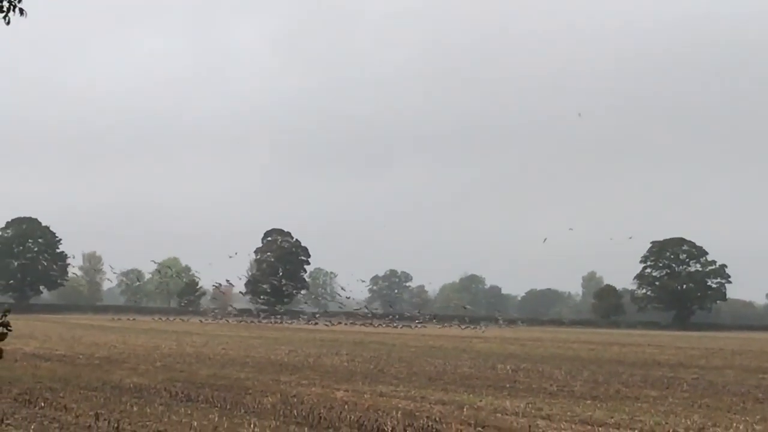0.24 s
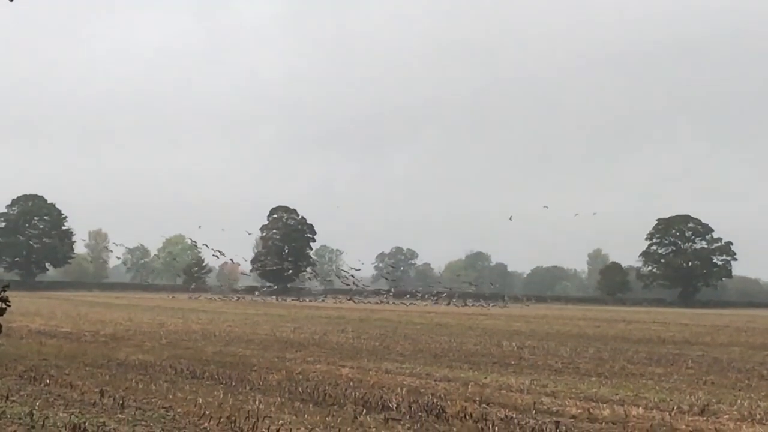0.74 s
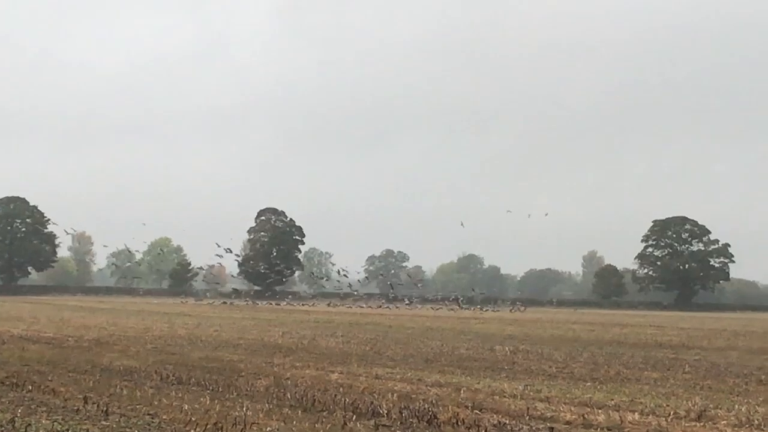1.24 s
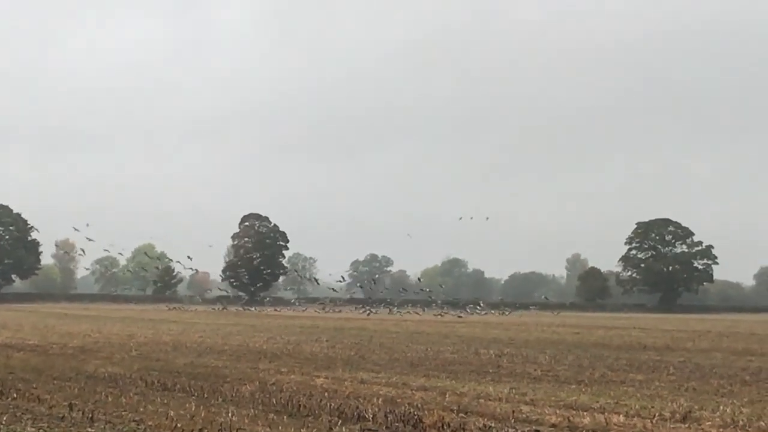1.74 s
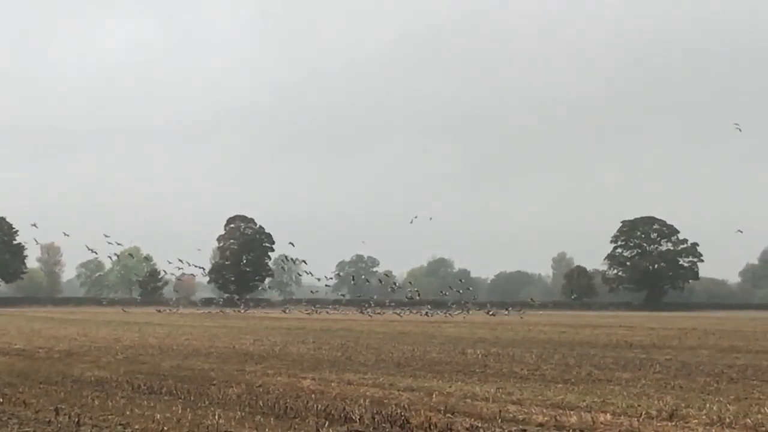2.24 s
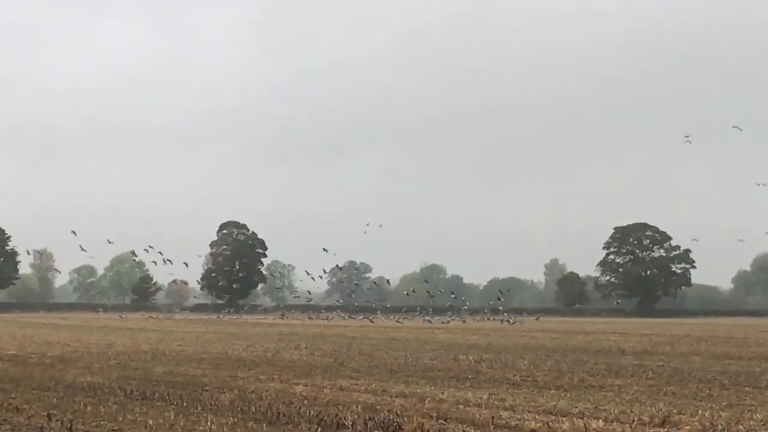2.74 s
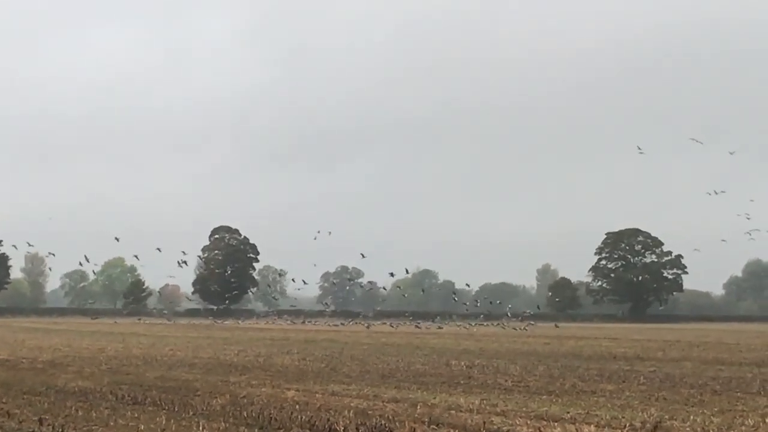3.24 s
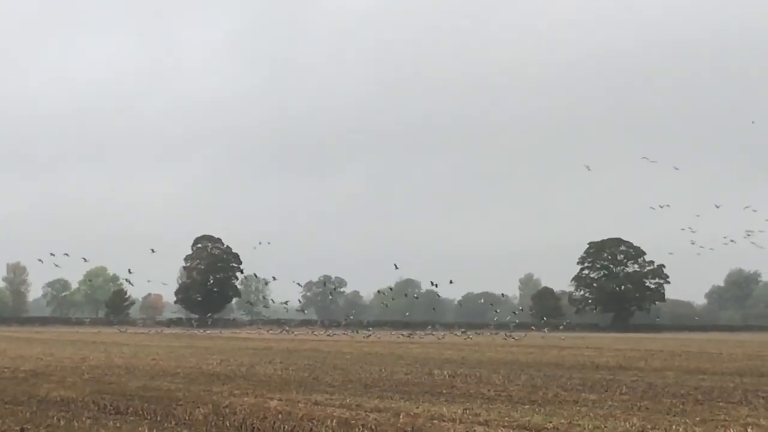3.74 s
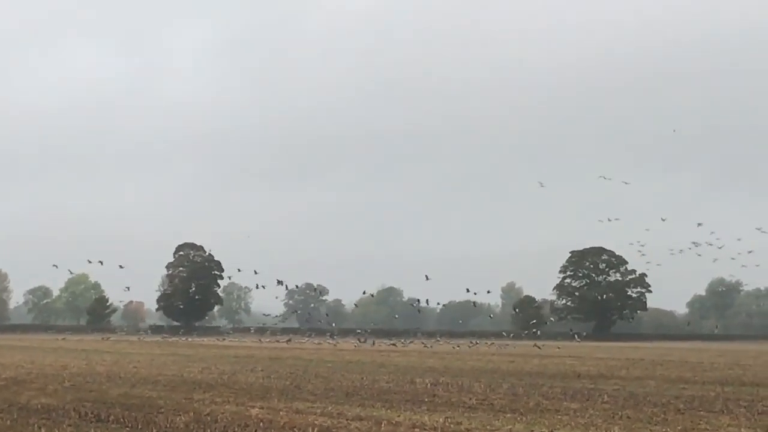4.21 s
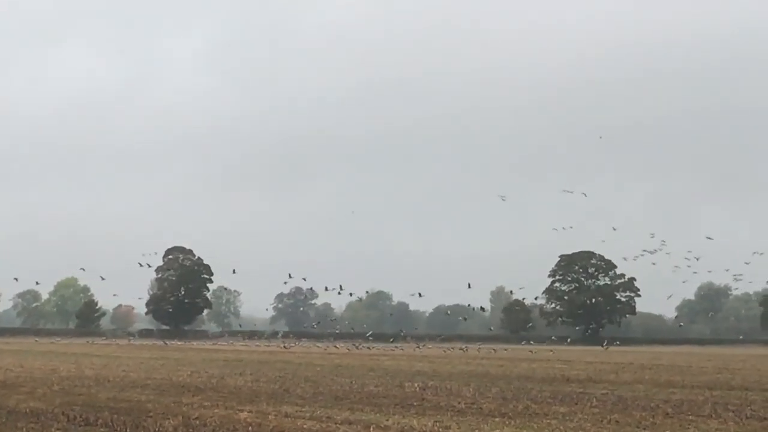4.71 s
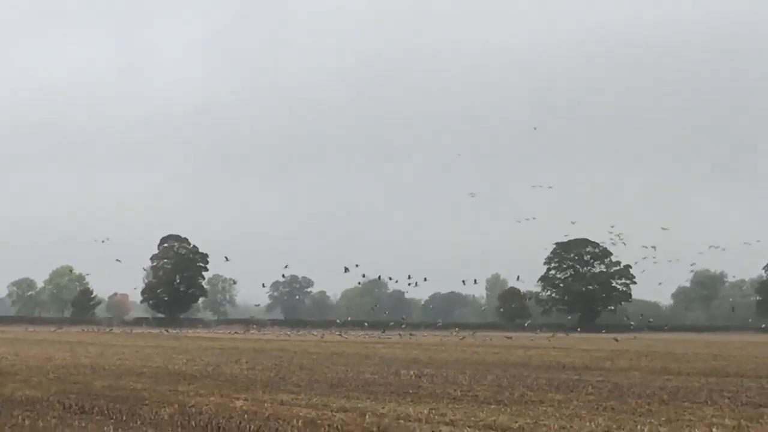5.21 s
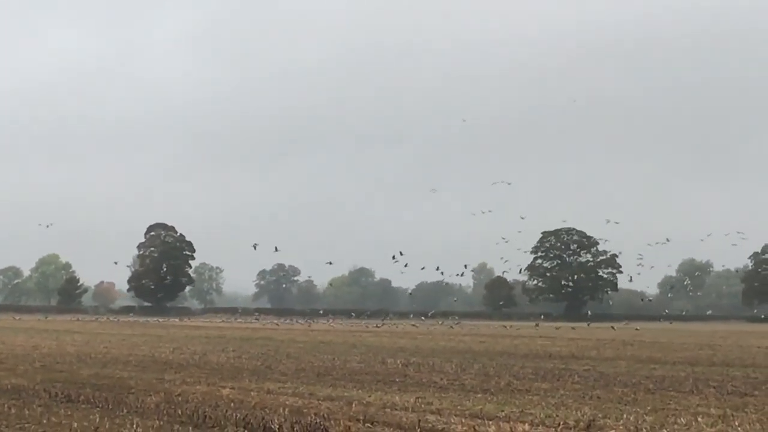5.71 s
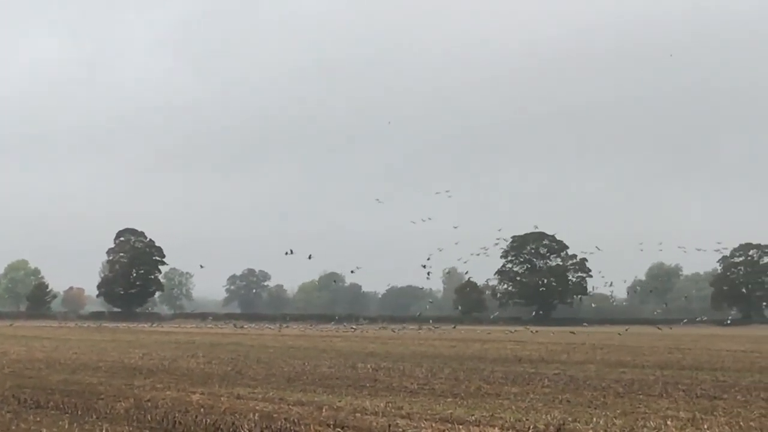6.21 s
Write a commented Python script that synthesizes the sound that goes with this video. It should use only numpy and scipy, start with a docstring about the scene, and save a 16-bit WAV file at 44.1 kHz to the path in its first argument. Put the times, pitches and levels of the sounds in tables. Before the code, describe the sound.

A large flock of geese calls from a distant open field for about six and a half seconds. From the first moment, low nasal honks, short hoarse cackles and high arching yelps stand out from a dense, overlapping chorus, with a slight echo from the trees. The calls sound thin, with little bass. A couple of small dry ticks come close by at about 1.2 seconds. The geese are loudest from 2.3 to 2.7 seconds, with a sharp yelp and a quick run of cackles. Honking continues, with more clear yelps around 3.4 and from 4.2 to 4.7 seconds. After 5 seconds the chorus thins somewhat but keeps going to the end, and faint dry ticks and very faint high seeps come more often. A far rumble, a low hum and soft microphone hiss lie beneath throughout.

```python
"""A large flock of geese rises from a distant stubble field. From the outset, hoarse cackles, low honks and
high arched yelps stand over a dense chorus: syrinx membranes pulse, chest and beak resonate, a tree line
echoes. The calls are strongest near 2.4 s; after 5 s the chorus thins, and faint seeps and dry ticks come
more often. Far rumble, a hum and microphone hiss lie beneath throughout."""
import sys
import numpy as np
from scipy import signal
from scipy.fft import rfft, irfft
from scipy.io import wavfile
from scipy.ndimage import uniform_filter1d

SR = 44100
rng = np.random.default_rng(int(sys.argv[2]) if len(sys.argv) > 2 else 0)


def master_out(mix):
    """Clip the mix to full scale and print it as 16-bit PCM to the path in sys.argv[1]."""
    frames = np.transpose(np.atleast_2d(mix))
    ceiling = np.clip(frames, -1, 1)
    pcm = np.round(ceiling * 32767).astype(np.int16)
    wavfile.write(sys.argv[1], SR, pcm)


N = 284886
CHEST_WIDTH_HZ, BEAK_WIDTH_HZ = 380, 720


def undb(db):
    """Amplitude ratio of a level: tenfold per 20 dB."""
    return 10 ** (np.asarray(db) / 20)


def level(x, db):
    """Normalisation to an rms level."""
    return x * undb(db) / np.sqrt(np.mean(x ** 2))


def ring(x, hz, width_hz):
    """Resonance: two equal resonators in cascade, with unit gain at the centre."""
    b, a = signal.iirpeak(hz, hz / width_hz, fs=SR)
    return signal.lfilter(b, a, signal.lfilter(b, a, x))


def highpass(x, hz, order):
    """Butterworth filtering: below the cutoff the level falls 6 dB per octave per order."""
    return signal.sosfilt(signal.butter(order, hz, "high", fs=SR, output="sos"), x)


def walk(rate_hz, size):
    """Random modulation: Gaussian values joined by ramps, standard deviation near 1."""
    hold = max(int(SR / rate_hz), 2)
    steps = np.repeat(rng.standard_normal(size // hold + 1), hold)
    return 1.217 * uniform_filter1d(steps, hold)[:size]


def coloured(points, db):
    """Spectral shaping: white noise weighted by a curve of (f/Hz, relative level/dB) points."""
    hz, gain_db = np.transpose(points)
    bins = np.maximum(np.fft.rfftfreq(N, 1 / SR), 1)
    gain = undb(np.interp(np.log(bins), np.log(hz), gain_db))
    return level(irfft(rfft(rng.standard_normal(N)) * gain, N), db)


def add(track, onset, sound):
    """Superposition: a sound joins the track at its onset in seconds."""
    i = int(onset * SR)
    part = sound[max(-i, 0):max(N - i, 0)]
    track[max(i, 0):max(i, 0) + len(part)] += part


def noise_floor():
    """Narrow-band noise hums; slow amplitude modulation swells the rumble and makes the hiss flicker."""
    # spectrum of the far rumble: f/Hz, relative level/dB
    rumble_spectrum = [(15, -48), (25, -30), (39, -3), (59, 1), (141, -9.5), (237, -9.5), (305, -20),
                       (397, -26), (505, -32.5), (600, -22.5), (780, -19), (1320, -120)]
    # spectrum of the microphone hiss: f/Hz, relative level/dB
    hiss_spectrum = [(500, 5), (3000, -6.5), (7600, -11), (9400, -11), (10400, -16), (13500, -10),
                     (16500, -14), (18000, -14)]
    hum = level(ring(rng.standard_normal(N), hz=48.5, width_hz=7.1), db=-64)
    rumble = coloured(rumble_spectrum, db=-56.5) * undb(.7 * walk(3, N))
    hiss = coloured(hiss_spectrum, db=-68) * undb(.8 * walk(12, N))
    whine = level(np.sin(2 * np.pi * 14000 * np.arange(N) / SR), db=-95)
    return rumble + hum + hiss + whine


def ticks():
    """Broadband transients: bright noise with a fast exponential decay and a faint slower tail."""
    # dry ticks close by: t/s, nominal peak level/dB
    cracks = [(1.194, -37), (1.257, -44), (3.2321, -48), (4.3879, -56), (4.4837, -49), (5.3078, -48),
              (5.524, -52), (5.573, -55), (5.671, -50), (5.7643, -53)]
    out, t = np.zeros(N), np.arange(SR // 20) / SR
    decay = np.exp(-t / .0017) + .16 * np.exp(-t / .012)
    for onset, db in cracks:
        add(out, onset, undb(db - 14.5) * rng.standard_normal(len(t)) * decay)
    return highpass(out, 5000, order=2)


def seeps():
    """Random amplitude modulation gives gliding tones sidebands that blur them into bands of noise."""
    # buzzy seeps and rustles: t/s, duration/s, start f/Hz, end f/Hz, width/Hz, level before the fade/dB
    glides = [(0.838, 0.1, 8140, 8060, 300, -82), (0.906, .05, 12500, 12400, 700, -82),
              (1.06, 0.13, 8160, 8150, 400, -82), (1.204, 0.11, 8400, 8100, 500, -80),
              (1.395, .05, 12600, 12600, 700, -82), (2.67, .05, 15200, 15200, 607, -77),
              (2.93, .03, 15000, 15000, 600, -81), (4.056, .12, 8460, 8200, 910, -78),
              (5.347, 0.27, 13700, 13200, 6000, -75.5), (5.364, 0.16, 7950, 7750, 450, -80),
              (5.415, 0.045, 14900, 15000, 1200, -70), (5.42, .018, 13000, 13000, 2500, -73),
              (5.465, 0.03, 14600, 15000, 1200, -70), (5.462, .022, 13000, 13000, 2500, -72),
              (5.47, .07, 12700, 12700, 600, -80), (5.49, 0.1, 7200, 7200, 500, -82),
              (6.258, 0.11, 8460, 8700, 810, -76)]
    out = np.zeros(N)
    for onset, length, start_hz, end_hz, width_hz, db in glides:
        u = np.arange(int(length * SR)) / (length * SR)
        tone = np.sin(2 * np.pi * np.cumsum(start_hz + (end_hz - start_hz) * u) / SR)
        fade = np.sqrt(np.sin(np.pi * u))
        add(out, onset, level(tone * walk(width_hz, len(u)), db) * fade)
    return out


def tree_echo(x, t60_s=.4, delay_s=.012, db=-12):
    """Scattering by the tree line: convolution with an exponentially decaying noise tail."""
    t = np.arange(SR // 2) / SR
    tail = rng.standard_normal(len(t)) * 1000 ** (-t / t60_s) * (t > delay_s)
    return undb(db) * signal.fftconvolve(x, tail / np.sqrt(np.sum(tail ** 2)))[:N]


def syrinx(length, hz, rise, sag, jitter, shimmer, taper):
    """Periodic membrane pulses form a harmonic series; its pitch rises to hz and sags, by fractions."""
    u = np.arange(int(length * SR)) / (length * SR)
    arch = hz * (1 - rise * (1 - u) * (1 - 2 * u) - sag * u * (2 * u - 1))
    pitch = arch * (1 + jitter * walk(89.14, len(u)))
    half_phase = np.pi * np.cumsum(pitch) / SR + 1e-3
    harmonics = int(7400 / hz)
    # closed-form sum of equally strong harmonics
    pulses = (np.sin((2 * harmonics + 1) * half_phase) / np.sin(half_phase) - 1) / np.sqrt(2)
    return pulses * (1 + shimmer * walk(300, len(u))) * np.sin(np.pi * u) ** taper


def chorus(formants, low_hz, high_hz, mean_s, arch, jitter, shimmer, count):
    """Incoherent summation: unrelated calls, evenly spread in time, pass through shared resonances."""
    calls = np.zeros(N)
    for k, (late, pitch, stretch, sag, loud) in enumerate(rng.random((count, 5))):
        hz = low_hz * (high_hz / low_hz) ** pitch
        pulses = syrinx(mean_s * (.5 + stretch), hz, arch / 2, arch * sag, jitter, shimmer, taper=.073)
        onset = (k + late) / count * (N / SR + .4) - .3
        add(calls, onset, pulses * np.sqrt(hz) * undb(6.3 * loud))
    crowd = sum(undb(db) * ring(calls, hz, width) for hz, width, db in formants)
    return crowd / np.sqrt(uniform_filter1d(crowd ** 2, size=SR // 8))  # running rms held near 1


def far_geese():
    """Four choruses superpose, their envelopes following the chest band, the beak band or the mean."""
    # loudness of the flock: t/s, chest band level/dB, beak band level/dB
    contour = [(0, -40, -45.5), (.13, -46, -47), (.27, -53, -49.5), (.38, -45.5, -49), (.62, -45, -51),
               (.9, -43.5, -49), (1.07, -45.5, -51), (1.2, -42, -46.5), (1.42, -48.5, -53.5),
               (1.71, -46.5, -53.5), (1.82, -50.5, -60), (1.91, -41, -58), (2.12, -46, -53.5),
               (2.19, -57, -58), (2.32, -46.5, -45.5), (2.53, -45.5, -48.5), (2.58, -46, -50),
               (2.72, -45, -55.5), (2.93, -42.5, -57.5), (3.03, -44, -60.5), (3.3, -45.5, -54.5),
               (3.72, -47.5, -58), (3.98, -49, -63.5), (4.1, -46, -59), (4.2, -47, -55.5),
               (4.41, -48.5, -60), (4.6, -46.5, -53), (5.2, -46, -57), (5.28, -52.5, -63),
               (5.37, -53.5, -61), (5.7, -56, -58.5), (6.03, -50.5, -54.5), (6.46, -49.5, -60)]
    # formants smeared over many birds, a set per kind of call: f/Hz, width/Hz, relative level/dB
    chest_formants = [(1110, 580, 15), (1122, 220, -3), (1357, 198, 6)]
    throat_formants = [(2337, 570, -0.5), (5770, 400, -19.5)]
    beak_formants = [(3335, 1320, 37), (4270, 3900, -27), (6000, 1800, -75)]
    yelp_formants = [(3430, 910, 2.5), (4200, 1000, -16), (1720, 320, 0)]
    times, *bands = np.transpose(contour)
    chest_db, beak_db = (np.interp(np.arange(N) / SR, times, band) for band in bands)
    honking = chorus(chest_formants, 210, 420, .095, arch=.1009, jitter=.0041, shimmer=.49, count=200)
    mixed = chorus(throat_formants, 250, 1150, .1, arch=.12, jitter=.0045, shimmer=.24, count=200)
    hoarse = chorus(beak_formants, 250, 620, .08, arch=.0615, jitter=.01227, shimmer=.25, count=320)
    yelping = chorus(yelp_formants, 840, 1250, .09, arch=.13, jitter=.003, shimmer=.25, count=110)
    return (undb(chest_db - 3) * honking + undb((chest_db + beak_db) / 2 - 10) * mixed
            + undb(beak_db - 5) * hoarse + undb(beak_db - 9) * yelping)


def cackles(crest_db=8.5):
    """Scattering by stubble and air smears each beak-filtered pulse over a few milliseconds."""
    # short hoarse calls: t/s, nominal peak level/dB, beak f/Hz, duration/s, fundamental f/Hz
    calls = [(.009, -48, 4050, 0.054, 231), (0.107, -45, 4070, 0.04, 236.6), (0.174, -58, 5050, 0.049, 225),
             (0.283, -47.5, 3850, 0.17, 228.3), (0.528, -51.5, 3900, 0.048, 236),
             (1.186, -51, 3500, 0.091, 231), (1.331, -49, 4480, 0.029, 230),
             (1.477, -49, 3530, 0.083, 232.3), (1.571, -53, 3420, 0.073, 226),
             (1.636, -50.5, 3600, 0.077, 229), (1.924, -62, 5440, 0.16, 266),
             (2.048, -61, 5700, 0.073, 267), (2.292, -41, 3600, 0.05, 234), (2.38, -44, 4200, 0.04, 232),
             (2.545, -41, 3600, 0.052, 225.3), (2.606, -41, 3600, 0.026, 229),
             (2.657, -43.5, 3750, 0.038, 232), (2.838, -54, 3950, 0.11, 227),
             (3.073, -55, 3580, 0.028, 230), (3.168, -55, 3600, 0.037, 228.4),
             (3.477, -51, 3240, 0.041, 213), (3.773, -54, 3920, 0.078, 311), (3.817, -61, 4660, 0.054, 450),
             (4.467, -44, 3220, 0.051, 226.3), (4.955, -53, 2820, 0.1, 230.5), (5.18, -70, 5460, 0.06, 232),
             (5.56, -52.5, 2870, 0.068, 230), (5.714, -54, 3600, 0.038, 230), (5.929, -47, 3360, 0.08, 314),
             (6.158, -53, 3400, 0.049, 225)]
    out = np.zeros(N)
    decay = np.exp(-np.arange(SR // 100) / SR / .003)
    for onset, db, beak_hz, length, hz in calls:
        pulses = syrinx(length, hz, rise=.0397, sag=.0397, jitter=.015, shimmer=.45, taper=.6)
        scattered = np.convolve(pulses, rng.standard_normal(len(decay)) * decay)
        voice = ring(scattered, beak_hz, 1100) + undb(-17) * ring(scattered, 5000, 1000)
        add(out, onset, level(voice, db - crest_db))
    return out


def honks():
    """Source and filter: low-pitched pulses excite the chest resonance and, faintly, the beak."""
    # low calls: t/s, duration/s, fundamental f/Hz, chest f/Hz, chest gain/dB
    calls = [(.025, .08, 275, 1300, -46), (.345, .07, 276, 1100, -49), (.5, .06, 275, 1100, -49),
             (.66, .07, 268, 1080, -50), (.895, .075, 280, 1150, -49), (2.548, .085, 224, 1170, -44.5),
             (5.15, .075, 265, 1300, -48), (.061, .173, 267, 1150, -48), (.227, .174, 286, 1250, -52),
             (.466, .29, 369, 1200, -51), (.596, .163, 266, 1200, -50), (.831, .23, 377, 1200, -50),
             (1.148, .304, 388, 1150, -51), (1.5, .14, 270, 1330, -49), (1.465, .125, 372, 1120, -45),
             (1.629, .112, 361, 1250, -52), (1.689, .251, 300, 1200, -52), (1.87, .1, 282, 1180, -45),
             (1.9, .08, 264, 1200, -48), (1.97, .18, 372, 1130, -47), (2.092, .089, 264, 1150, -48),
             (2.225, .22, 350, 1250, -56), (2.61, .2, 231, 1220, -44.5), (2.6, .3, 386, 1500, -53),
             (2.64, .12, 314, 1270, -50), (2.815, .07, 232, 1230, -43), (2.89, .075, 278, 1200, -44),
             (2.971, .189, 375, 1250, -50), (3.11, .13, 398, 1520, -53), (3.278, .075, 227, 1450, -49),
             (3.33, .22, 406, 1500, -51), (3.474, .099, 382, 1250, -55), (3.57, .112, 300, 1300, -53),
             (3.632, .159, 362, 1150, -55), (4.004, .133, 278, 1250, -54), (4.147, .091, 251, 1250, -51),
             (4.506, .101, 408, 1500, -55), (4.614, .144, 227, 1300, -51), (4.722, .182, 262, 1200, -52),
             (4.793, .189, 370, 1100, -58), (4.984, .212, 265, 1300, -51), (5.18, .159, 396, 1400, -56),
             (5.464, .235, 271, 1200, -60), (5.6, .13, 263, 1560, -59), (5.73, .16, 350, 1600, -58),
             (5.748, .112, 234, 1500, -56), (5.83, .07, 270, 1500, -53), (5.84, .16, 374, 1130, -55),
             (6.0, .065, 275, 1110, -50), (6.09, .06, 266, 1080, -51), (6.13, .11, 373, 1120, -53),
             (6.235, .07, 364, 1100, -52), (6.315, .1, 328, 1300, -54), (6.261, .148, 267, 1150, -51)]
    out = np.zeros(N)
    for onset, length, hz, chest_hz, db in calls:
        pulses = syrinx(length, hz, rise=.0253, sag=.03, jitter=.007, shimmer=.35, taper=.2)
        chest = ring(pulses, chest_hz, CHEST_WIDTH_HZ)
        beak = undb(-20.5) * ring(pulses, 3120, BEAK_WIDTH_HZ)
        upper_harmonics = undb(-36.5) * ring(pulses, 4700, 1540)
        add(out, onset, undb(db) * (chest + beak + upper_harmonics))
    return out


def yelp(length, start_hz, mid_hz, end_hz, formants, air_db_per_khz=-2.5):
    """Additive synthesis: eight gliding harmonics, weighted by formants and by air absorption."""
    u = np.arange(int(length * SR)) / (length * SR)
    bulge_hz = (mid_hz - (start_hz + end_hz) / 2) * (1 - np.abs(2 * u - 1) ** 2.4)  # flat-topped arch
    pitch = (start_hz + (end_hz - start_hz) * u + bulge_hz) * (1 + .004 * walk(55, len(u)))
    k = np.arange(1, 9)[:, None]
    f = k * pitch
    power = sum(undb(db) ** 2 / (1 + ((f - hz ** 2 / f) / width) ** 2) ** 3 for hz, width, db in formants)
    air_gain = undb(air_db_per_khz * np.maximum(f - 4000, 0) / 1000)
    tones = np.sqrt(2 * power) * air_gain * np.sin(k * 2 * np.pi * np.cumsum(pitch) / SR)
    # higher harmonics sound only near full effort
    effort = np.sin(np.pi * u ** 1.1) ** (.33 + .007 * k ** 2.5) * undb(2 * walk(30, len(u)))
    shimmer = 1 + .3 * walk(250, len(u))
    return (tones * effort).sum(axis=0) * shimmer


def yelps():
    """Resonances pick out the second harmonic, the beak band and a shrill overtone of each high call."""
    # high calls: t/s, duration/s, fundamental f/Hz at start, middle and end, second harmonic level/dB,
    # beak f/Hz, beak level/dB, overtone f/Hz, overtone level/dB (levels at resonance, before absorption)
    calls = [(.105, .055, 990, 975, 950, -66, 3900, -57, 4900, -63),
             (.3, .1, 1200, 1190, 1130, -66, 3600, -59, 4800, -63),
             (.375, .123, 852, 874, 898, -52.5, 3500, -59, 4400, -63),
             (.395, .088, 1125, 1185, 1050, -66, 3480, -51.5, 4600, -67),
             (.5, .1, 930, 960, 985, -66, 3850, -58, 4800, -68),
             (.89, .175, 839, 864, 870, -62, 4320, -60, 5200, -66),
             (.98, .15, 880, 875, 860, -64, 3500, -58, 2620, -60),
             (1.226, .072, 1056, 1019, 986, -68, 4080, -60, 5100, -72),
             (1.238, .294, 904, 897, 851, -57, 2690, -65.3, 5350, -74),
             (1.429, .103, 902, 915, 926, -72, 4580, -62, 5500, -76),
             (2.135, .15, 790, 885, 900, -58, 3560, -56, 4850, -58),
             (2.33, .092, 1100, 1085, 1190, -49, 3260, -60, 5450, -64),
             (2.39, .122, 1130, 1250, 1075, -62, 3600, -38.5, 6240, -63),
             (2.418, .114, 866, 885, 895, -49.4, 3540, -60.6, 5300, -66),
             (2.5, .09, 1205, 1231, 1222, -65, 3690, -53, 6150, -72),
             (2.54, .065, 1020, 965, 895, -69, 2880, -51, 3800, -62),
             (2.899, .177, 887, 892, 885, -55.8, 2680, -63, 3570, -68),
             (3.13, .09, 1250, 1150, 1060, -75, 3450, -65, 4600, -72),
             (3.297, .075, 1081, 1093, 1082, -68, 3260, -56, 4370, -68),
             (3.428, .056, 1110, 1125, 1000, -66, 3250, -50.5, 6600, -72),
             (3.548, .055, 1110, 1075, 1025, -72, 3100, -59, 4300, -72),
             (3.61, .15, 890, 910, 890, -64, 3630, -63, 5000, -64),
             (3.771, .071, 915, 917, 929, -61.3, 3670, -60, 4600, -68),
             (3.83, .065, 1330, 1300, 1210, -70, 3850, -63, 5200, -72),
             (3.9, .21, 975, 1037, 1000, -65.5, 3110, -58, 4100, -72),
             (4.19, .225, 780, 916, 815, -51.5, 2750, -53, 6400, -66),
             (4.532, .08, 1089, 1069, 1067, -64, 3210, -52.5, 5350, -68),
             (4.6, .045, 1060, 1050, 1010, -72, 3150, -70, 5200, -71),
             (4.643, .09, 1082, 1081, 1086, -58.9, 3240, -59.4, 5410, -66),
             (4.65, .06, 1170, 1150, 980, -66, 3350, -51.5, 4500, -72),
             (5.067, .106, 1013, 1016, 992, -62, 3050, -59, 5080, -72),
             (5.088, .13, 1072, 1077, 1077, -55, 3230, -61, 4300, -72),
             (5.27, .07, 1225, 1230, 1215, -62, 3690, -74, 4900, -80),
             (5.545, .261, 722, 785, 736, -61, 3140, -70, 6280, -66),
             (5.85, .1, 975, 990, 1030, -70, 3000, -61, 4000, -72),
             (6.027, .071, 976, 979, 958, -75, 3920, -64, 4900, -74),
             (6.15, .07, 1157, 1120, 1101, -61.7, 3360, -68, 4500, -76)]
    out = np.zeros(N)
    for onset, length, start_hz, mid_hz, end_hz, second_db, beak_hz, beak_db, top_hz, top_db in calls:
        formants = [(2 * mid_hz, CHEST_WIDTH_HZ, second_db),
                    (4000, 1800, min(second_db, beak_db) - 8),  # weak, broad fill
                    (beak_hz, BEAK_WIDTH_HZ, beak_db),
                    (top_hz, BEAK_WIDTH_HZ, top_db)]
        add(out, onset, yelp(length, start_hz, mid_hz, end_hz, formants))
    return out


def scene():
    """Ground effect thins the bass of the geese and their echo; the background adds linearly."""
    geese = honks() + yelps() + cackles() + far_geese()
    geese = highpass(geese + tree_echo(geese), 900, order=4)
    return (geese + seeps() + ticks() + noise_floor())[None]


def record(dry, low_hz=42, top_hz=17170):
    """Band limiting: the phone drops the deepest bass and cuts the top steeply."""
    lowpass = signal.ellip(10, .2, 70, top_hz, fs=SR, output="sos")
    return signal.sosfilt(lowpass, highpass(dry, low_hz, order=4))


dry = scene()
out = record(dry)
master_out(out)
```